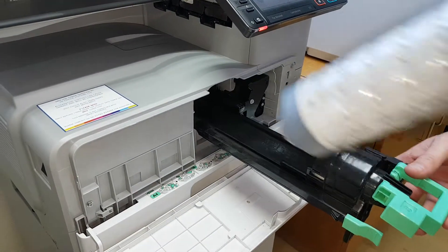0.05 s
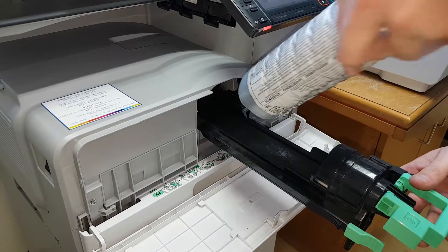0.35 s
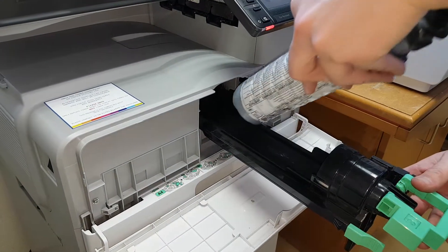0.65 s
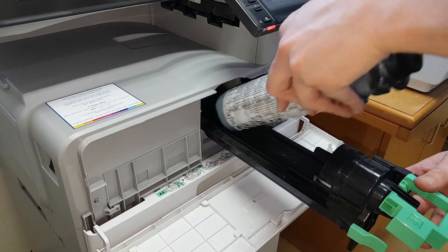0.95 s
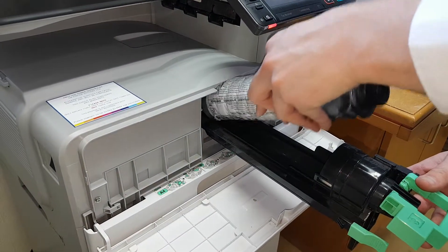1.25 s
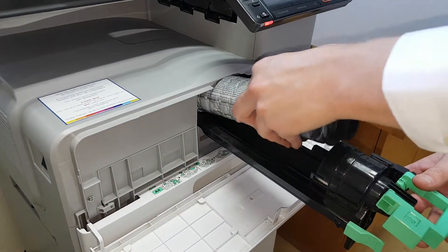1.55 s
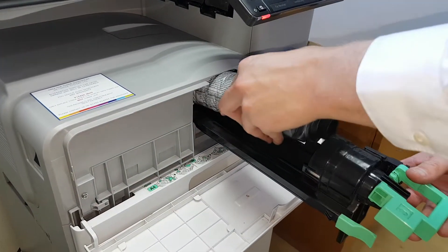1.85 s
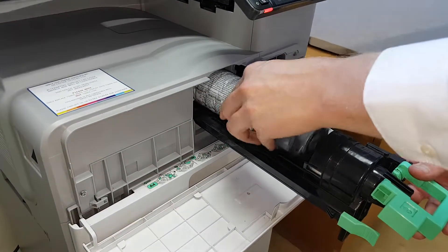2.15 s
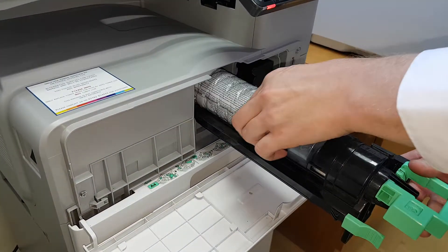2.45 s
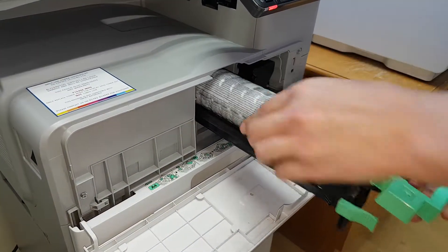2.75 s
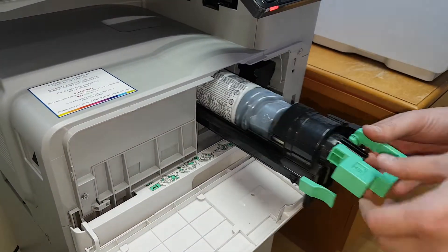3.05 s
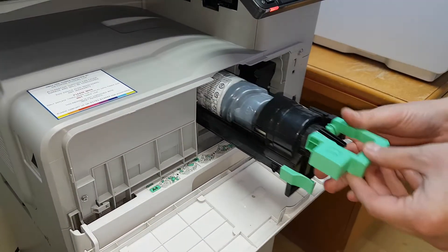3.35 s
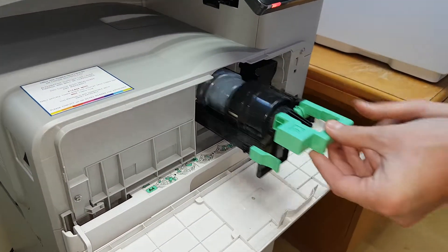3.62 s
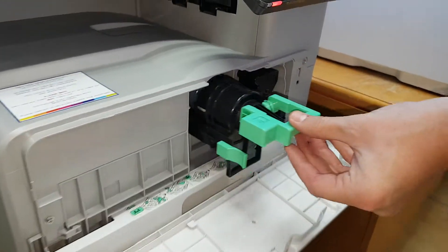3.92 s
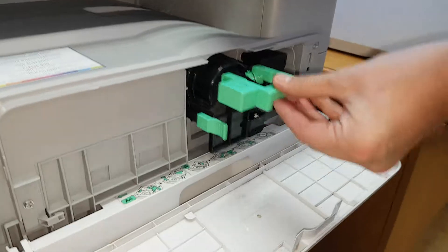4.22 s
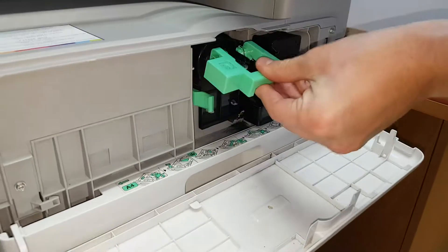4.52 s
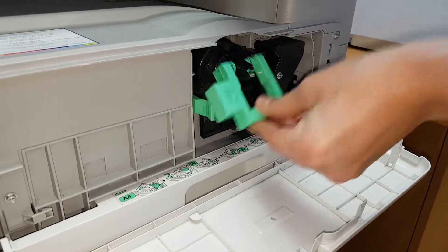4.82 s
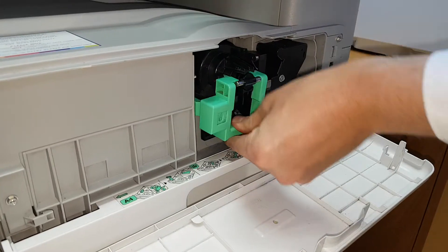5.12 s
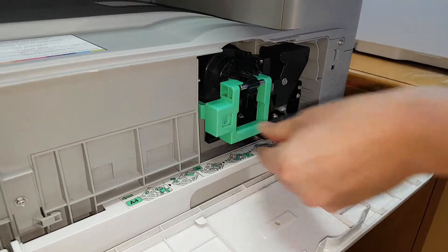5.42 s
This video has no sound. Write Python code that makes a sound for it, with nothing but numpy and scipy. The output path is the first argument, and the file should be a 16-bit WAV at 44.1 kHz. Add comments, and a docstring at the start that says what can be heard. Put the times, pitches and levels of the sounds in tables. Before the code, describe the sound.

Soft plastic taps and sliding lead to a loud, rattling clunk and latch clicks as a toner holder seats in an office copier.

```python
"""Hollow taps and rubbing: a plastic toner bottle is laid into the pulled-out holder of a copier.
The holder slides in on its rails and seats with a clunk that sets its sprung parts chattering;
its lever is pressed down, squeaks faintly and latches. Each knock rings the plastic, then the room.
The place is a small office with humming ventilation, heard from a hand-held stereo microphone."""
import sys
import numpy as np
from scipy import signal
from scipy.fft import rfft, irfft, next_fast_len
from scipy.io import wavfile
from scipy.ndimage import uniform_filter1d, map_coordinates

SR = 44100
rng = np.random.default_rng(int(sys.argv[2]) if len(sys.argv) > 2 else 0)


def log_audio(samples):
    """Write samples as a 16-bit WAV file to the path given in sys.argv[1]."""
    # one column per channel
    frames = np.atleast_2d(samples).T
    # limit to full scale, then quantise
    limited = np.clip(frames, -1, 1)
    pcm = np.round(limited * 32767).astype(np.int16)
    wavfile.write(sys.argv[1], SR, pcm)


N = 245637

# bottle against holder and housing: t/s, struck spot f/Hz, level/dB, weight/dB, hardness/dB
BOTTLE_TAPS = [(.210, 4500, -53, -16, 2), (.218, 1066, -51, -15, 3), (.372, 570, -49, -8, -32),
               (.389, 645, -51, -4, -18), (.728, 1130, -51.5, -29, -25), (.932, 4660, -59.5, -33, -11.5),
               (1.004, 3700, -51, -41, -11), (1.077, 1196, -46.5, 0.5, -9), (1.19, 388, -48, 3, -49),
               (1.287, 420, -43.5, -8, -25), (1.297, 1560, -45.5, 4.5, -22.5), (1.324, 3120, -54.5, 5, -11),
               (1.405, 4670, -58.5, -19, -4), (1.503, 1350, -52.5, 10.5, 9), (1.512, 1004, -47, -0.5, -7),
               (1.584, 690, -45, -11, -20.5), (1.593, 1620, -39, -1.5, -47), (1.602, 630, -41, -1, -45),
               (1.766, 444, -47.5, 11, -13.5), (2.042, 1660, -46.5, -35, -26),
               (2.063, 4050, -46, -37, -19.5), (2.159, 1337, -43, -4, -13.5), (2.218, 453, -51.5, 12, -3.5),
               (2.339, 1400, -40, -0.5, -15.5), (2.381, 150, -51.5, 13, -40), (2.39, 5100, -48.5, -7, 2.5),
               (2.402, 3530, -42.5, -27, -10), (2.443, 1170, -36.5, -11, -51), (2.49, 3470, -46, -37, -19),
               (2.603, 2170, -55, 2, 2), (2.67, 3600, -50, -18, -19), (2.859, 451, -41.5, -2, -85)]


def bottle():
    """The hollow bottle taps its way into the holder; the hand damps the struck spot."""
    return amp(-1.5) * contacts(BOTTLE_TAPS, ring=.98, room_db=5, room_t60=.33, rise_s=.00023,
                                shared=.53, spot_db=14.5, spot_ring=.33)


# holder against rails, stop and latch: t/s, struck spot f/Hz, level/dB, weight/dB, hardness/dB
HOLDER_KNOCKS = [(3.554, 1510, -46, -4.5, -17), (4.141, 1300, -52, -6, -26), (4.338, 2736, -42.5, -35, -9),
                 (4.353, 750, -40, -6, -48.5), (4.373, 798, -36, -6.5, -22), (4.384, 1220, -30.5, -3, -19),
                 (4.424, 2810, -22.5, -11, 0), (4.792, 5640, -57, 11, -1), (4.808, 448, -54, 1, 4.5),
                 (4.835, 683, -35, -4.5, -18), (4.844, 228, -39.5, 2, -13.5), (4.879, 353, -49, 9, -15),
                 (4.932, 5860, -49, 15, 17.5), (5.062, 3190, -44, 0.5, 0), (5.071, 3035, -21.5, -65, -9.5),
                 (5.079, 2960, -31.5, -27, -11.5), (5.091, 1227, -29.5, 0, -7.5),
                 (5.229, 5470, -57, 7.5, 15), (5.288, 4030, -53, -6, 12.5), (5.315, 730, -48.5, 7, 8),
                 (5.35, 442, -48, 4.5, -18.5), (5.543, 1466, -53, 3, -35)]


def holder():
    """The holder bumps along, hits its stop, and its lever snaps shut."""
    return contacts(HOLDER_KNOCKS, ring=1, room_db=4.5, room_t60=.27, rise_s=.0001,
                    shared=.61, spot_db=12.5, spot_ring=.6)


# sprung parts clack, falter, then catch again at a higher ring: t/s, f/Hz, level/dB, hardness/dB
CLACKS = [(4.424, 5100, -36.5, 8.5), (4.4337, 1955, -36.5, 6), (4.4433, 3680, -36, 13),
          (4.4528, 2790, -36, 3.5), (4.4627, 2010, -38.5, 6.5), (4.4723, 2850, -36.5, 5),
          (4.4826, 2900, -35.5, 4), (4.494, 1990, -40.5, 3), (4.506, 3050, -43, 4),
          (4.515, 3120, -42.5, 2.5), (4.5258, 3180, -39.5, 2.5), (4.537, 3140, -42, 1.5),
          (4.548, 3040, -44, -4.5), (4.57, 2750, -47, -8)]
# colour of the small sprung parts: f/Hz, level/dB
SPRUNG_COLOUR = [(700, -4.5), (1760, 10.5), (3400, 8), (6900, 5), (12000, 0)]


def chatter():
    """As the holder seats, light sprung parts clack in an uneven run, each trailed by a looser part."""
    weight_db, loose_db, loose_lag_s = -5, -8, .003
    clacks = [(s + rng.normal(0, .00012), hz, db, weight_db, hardness_db)
              for s, hz, db, hardness_db in CLACKS]
    loose = [(s + loose_lag_s * rng.uniform(.5, 1.5), hz * rng.uniform(.7, 1.4), db + loose_db, *touch)
             for s, hz, db, *touch in clacks]
    track = contacts(clacks + loose, ring=.6, room_db=-7, room_t60=.36, rise_s=.0002,
                     shared=.75, spot_db=11, spot_ring=.6)
    track = filtered(track, lambda hz: amp(along(SPRUNG_COLOUR, hz)))
    t = np.arange(SR // 6) / SR
    add(track, CLACKS[0][0], grinding(t))
    return track + frame(t, clacks)


def grinding(t):
    """Loose edges grind between the clacks: steady while the holder stops, then dying away."""
    hold_s, fall_db_per_s = .039, 232
    level_db = -26 - fall_db_per_s * np.maximum(t - hold_s, 0)
    return amp(level_db) * coloured(rng.laplace(size=(2, len(t))), [(300, -6), (4000, 6.5), (16000, -13)])


# modes of the copier's frame: f/Hz, level/dB, t60/s
FRAME_MODES = [(210, -2, .16), (412, 0, .12), (699, -2, .12), (852, -7, .15), (1405, -5, .15),
               (1674, -5, .15), (1965, 4, .14), (2550, -1, .12), (2820, 3, .12), (3102, 3, .1),
               (3201, 3, .11), (3782, -1, .1), (5130, 8, .06)]


def frame(t, clacks):
    """Each clack rings the frame, whose low modes build up while the run is steady."""
    coupling_db = 3.5
    track = np.zeros((2, N))
    for hz, mode_db, t60 in FRAME_MODES:
        side = rng.choice([-1, 1])
        for s, _, clack_db, *_ in clacks:
            level_db = clack_db + mode_db + coupling_db + 2 * rng.standard_normal()
            add(track, s, amp(level_db) * mode(t, hz, t60, side))
    return track


# a knock on plastic, by octave: f/Hz, level/dB, plastic t60/s, room answer/dB
KNOCK_OCTAVES = [(113.6, -2.5, 0.082, 18), (227, -0.5, 0.14, -12), (464, 0, 0.12, 11.5),
                 (985, 0, 0.097, -17), (1720, 0, 0.12, -14.5), (3530, 4, 0.053, -26), (6760, 3, 0.025, -28),
                 (14600, -1.5, 0.016, -37.5)]


def contacts(rows, ring, room_db, room_t60, rise_s, shared, spot_db, spot_ring):
    """Knocks ring dense plastic modes and one mode of the struck spot; ring and spot_ring scale t60."""
    size = next_fast_len(SR // 5)
    t, hz = np.arange(size) / SR, np.fft.rfftfreq(size, 1 / SR)
    centre, colour_db, t60, answer_db = np.transpose(KNOCK_OCTAVES)[:, :, None]
    crossfades = [np.interp(np.log(hz + 1), np.log(centre[:, 0]), one) for one in np.eye(len(centre))]
    bands = np.sqrt(crossfades) * timbre(hz)
    attack = 1 - np.exp(-t / (rise_s + .5 / centre))  # modes need about a cycle to build up
    room_tail = amp(answer_db + room_db) * fade(t, room_t60)
    envelope = attack * np.hypot(fade(t, t60 * ring), room_tail)
    envelope /= envelope.max(axis=1, keepdims=True)
    common_modes = rng.standard_normal((2, size))  # the same at every knock
    track = np.zeros((2, N))
    for s, spot_hz, *touch in rows:
        modes = spread(shared * common_modes + np.sqrt(1 - shared ** 2) * rng.standard_normal((2, size)))
        rings = irfft(rfft(modes)[:, None] * bands, size) * envelope
        energy = np.sum(rings ** 2, axis=2).mean(axis=0)
        band_gain = np.sqrt(np.sum(envelope ** 2, axis=1) / energy)[:, None]
        blow = np.sum(rings * band_gain * amp(colour_db + force(centre, *touch)), axis=1)
        add(track, s, blow)
        add(track, s - rng.uniform(.002, .006), amp(-21) * blow)  # a faint early copy softens the attack
        spot_t60 = spot_ring * along(np.hstack([centre, t60]), spot_hz)
        spot = mode(t, spot_hz, spot_t60, side=rng.choice([-1, 1]))
        add(track, s, amp(spot_db + force(spot_hz, *touch)) * spot)
    return track


def force(hz, level_db, weight_db, hardness_db):
    """Level of a blow at each frequency: a heavy one thumps, a hard one snaps."""
    bass_hz, treble_hz = 340, 4200
    return level_db + weight_db / (1 + (hz / bass_hz) ** 2) + hardness_db / (1 + (treble_hz / hz) ** 2)


def mode(t, hz, t60, side):
    """One ringing mode; it reaches the given side of the microphone first."""
    lead = side * stereo_angle(hz)
    phase = 2 * np.pi * hz * t
    return fade(t, t60) * (1 - np.exp(-t * hz)) * np.sin([phase + lead, phase - lead])


# resonances of the hollow plastic, then three rows of overall treble colour: f/Hz, width/Hz, level/dB
TIMBRE_BANDS = [(108, 5.8, 15.5), (151, 14, 10.5), (224, 29, 15.5), (423, 11, 13.5), (560, 90, 2.5),
                (705, 28, 2), (858, 14, 8.5), (1410, 110, 3.5), (2900, 660, -1), (4560, 1200, 2),
                (7200, 1600, 5), (9340, 1400, -5.5), (15000, 1500, -1)]


def timbre(hz):
    """Gain on knocks and rubbing: hollow plastic resonances, an overall treble colour, no deep bass."""
    peaks = sum((amp(db) - 1) / (1 + (2 * (hz - centre) / width) ** 2)
                for centre, width, db in TIMBRE_BANDS)
    return (1 + peaks) * (1 - np.exp(-(hz / 88) ** 4))


# plastic rubbing on plastic: t/s, length/s, level/dB
STROKES = [(0.087, 0.3, -66), (1.222, 0.53, -61), (1.666, 0.11, -58.5), (1.797, 0.28, -65),
           (2.114, 0.39, -61.5), (2.302, 0.14, -55), (2.667, 0.36, -56.5), (4.786, 0.12, -52),
           (4.982, 0.21, -60), (5.291, 0.085, -53), (5.395, 0.18, -69.5)]
# rail friction as the holder is pushed home: t/s, level/dB
RAIL_FRICTION = [(3.0, -75), (3.1, -56), (3.26, -62.5), (3.53, -55), (3.72, -53.5), (3.92, -59.5),
                 (4.29, -61.5), (4.42, -41.5), (4.7, -89)]
# colour of the low scrape: f/Hz, level/dB
SCRAPE_COLOUR = [(150, -4), (300, -11), (700, -3.5), (1500, -4), (2500, -5.5), (4000, -26.5)]
# colour of the sliding hiss: f/Hz, level/dB
HISS_COLOUR = [(1200, -34), (2800, -0.5), (5500, -5), (7200, -13), (9000, -13.5), (12000, -18)]


def rubbing():
    """Bottle and holder slide; harder rubbing is louder and brighter, and the hands never quite rest."""
    ramp_s, handling_db = .035, -75.5
    t = np.arange(N) / SR
    rails_db = np.interp(t, *np.transpose(RAIL_FRICTION))
    power = amp(handling_db) ** 2 + amp(rails_db) ** 2
    for s, length, db in STROKES:
        stroke = np.clip(np.minimum((t - s) / ramp_s, 1 - (t - s - length) / ramp_s), 0, 1)
        power += (amp(db) * stroke) ** 2
    rub_db = 10 * np.log10(power)
    scrape = amp(.8 * rub_db - 9) * coloured(slips(ticks_per_s=4.2, grit_db=34.5), SCRAPE_COLOUR)
    hiss = amp(rub_db - .5) * coloured(slips(ticks_per_s=51, grit_db=26.5), HISS_COLOUR)
    return scrape + hiss


def slips(ticks_per_s, grit_db):
    """Countless tiny slips in uneven clumps, with coarser ticks, in the same timbre as the knocks."""
    clumps = amp(1.2 * wobble(25) + 1.1 * wobble(220))
    grit = (rng.random(N) < ticks_per_s / SR) * (2 * rng.random((2, N)) - 1)
    friction = rng.laplace(size=(2, N)) * clumps + amp(grit_db) * grit
    return filtered(patchy(friction, depth_db=2.8), timbre)


def patchy(pair, depth_db):
    """Narrow resonances come and go as the point of contact moves."""
    spectra = signal.stft(pair, nperseg=1024)[2]
    patches = uniform_filter1d(rng.standard_normal(spectra.shape[1:]), size=4, axis=0)
    patches = uniform_filter1d(patches, size=12, axis=1)
    return signal.istft(spectra * amp(depth_db * unit(patches)), nperseg=1024)[1][:, :N]


# faint squeaks as the lever turns: t/s, level/dB
SQUEAKS = [(4.852, -51), (5.016, -57), (5.168, -51)]


def pivot():
    """Plastic sticks and slips in the lever's pivot: short, wavering tones."""
    pitch_hz, waver_hz, length_s = 3530, 69, .031
    t = np.arange(N) / SR
    swell = sum(amp(db) * np.sin(np.pi * np.clip((t - s) / length_s, 0, 1)) for s, db in SQUEAKS)
    phase = 2 * np.pi * np.cumsum(pitch_hz + waver_hz * wobble(300)) / SR
    return swell * spread(np.array([np.sin(phase), np.cos(phase)]))


# colour of the ventilation: f/Hz, level/dB
AIR_COLOUR = [(20, -6), (70, -23.5), (110, -9.5), (216, -1), (300, -11), (700, -16.5), (1000, -16.5),
              (2000, -26), (3000, -30.5), (8000, -47.5), (10200, -44.5), (16000, -40.5)]
# a fan's tones: f/Hz, relative level/dB
FAN_TONES = [(210, -54), (414.5, -70)]


def office():
    """Ventilation and a slightly unsteady fan, with a low rumble beneath them."""
    air = amp(-52.5) * coloured(rng.standard_normal((2, N)), AIR_COLOUR)
    fan = 0
    for hz, db in FAN_TONES:
        phase = 2 * np.pi * np.cumsum(hz + 2.55 * wobble(12)) / SR
        fan += np.sqrt(2) * amp(db - 10 + .61 * wobble(5.6)) * np.sin(phase)
    rumble_colour = [(22, -21), (35, .5), (56, -2.5), (75, -12.5), (140, -61), (400, -100)]
    rumble = amp(-55) * coloured(rng.standard_normal((2, N)), rumble_colour)
    return air + fan + rumble


# likeness of left and right at the microphone: f/Hz, correlation
LIKENESS = [(130, 0.98), (290, 0.94), (640, 0.71), (1400, 0), (3000, 0.25), (6000, 0)]


def stereo_angle(hz):
    """Half the angle between left and right: alike in the bass, mostly unrelated in the treble."""
    return np.arccos(np.clip(along(LIKENESS, hz), -1, 1)) / 2


def spread(pair):
    """Two unrelated signals become mid and side, then left and right."""
    mid, side = filtered(pair, lambda hz: np.array([np.cos(stereo_angle(hz)), np.sin(stereo_angle(hz))]))
    return np.array([mid + side, mid - side])


def coloured(pair, colour):
    """Stereo sound of rms 1 with the given colour."""
    return unit(filtered(spread(pair), lambda hz: amp(along(colour, hz))))


def filtered(x, response):
    """x shaped by a gain at each frequency."""
    size = x.shape[-1]
    padded = next_fast_len(size + 2048)
    return irfft(rfft(x, padded) * response(np.fft.rfftfreq(padded, 1 / SR)), padded)[..., :size]


def amp(db):
    """Decibels to gain."""
    return 10 ** (np.asarray(db) / 20)


def unit(x):
    """Scaled to rms 1."""
    return x / np.sqrt(np.mean(x ** 2) + 1e-20)


def along(points, hz):
    """Interpolate (f/Hz, value) points on a log axis."""
    point_hz, values = np.transpose(points)
    return np.interp(np.log(hz + 1), np.log(point_hz + 1), values)


def wobble(rate):
    """A smooth random curve, rate knots a second."""
    knots = rng.standard_normal(int(N * rate / SR) + 4)
    return map_coordinates(knots, [np.arange(N) * rate / SR], order=2)


def fade(t, t60):
    """Free decay by 60 dB in t60 seconds."""
    return np.exp(-np.log(1000) * t / t60)


def add(track, s, sound):
    """Mix a sound into the track at time s."""
    part = track[:, round(s * SR):][:, :sound.shape[1]]
    part += sound[:, :part.shape[1]]


def scene():
    """Copier and office as they reach the microphone."""
    return bottle() + holder() + chatter() + pivot() + rubbing() + office()


# balance of the microphone's two ports: f/Hz, left minus right/dB
PORT_BALANCE = [(400, 0), (900, -1), (2400, -.5), (4400, -5), (5700, -8), (7400, -4), (10000, 4),
                (15000, -1)]


def record(dry):
    """The microphone's ports colour the treble differently; peaks clip; the band ends steeply."""
    top_hz = 16200
    ports = filtered(dry, lambda hz: amp(np.outer([.5, -.5], along(PORT_BALANCE, hz))))
    return filtered(np.clip(ports, -.9, .9), lambda hz: hz < top_hz)


dry = scene()
out = record(dry)
log_audio(out)
```